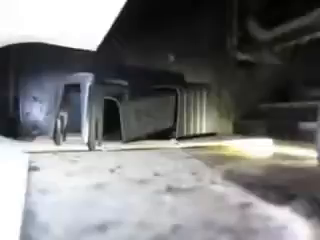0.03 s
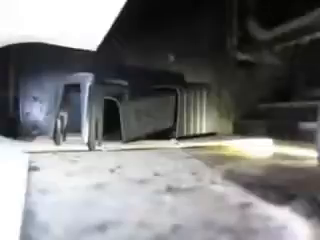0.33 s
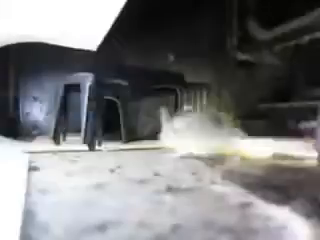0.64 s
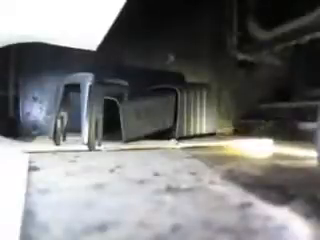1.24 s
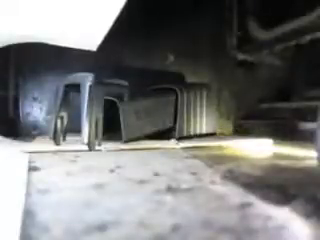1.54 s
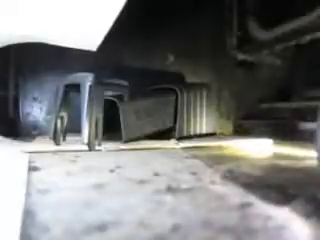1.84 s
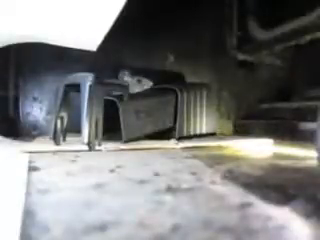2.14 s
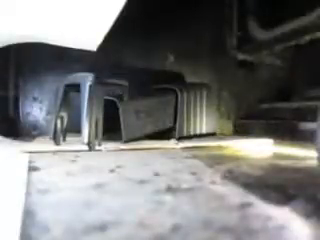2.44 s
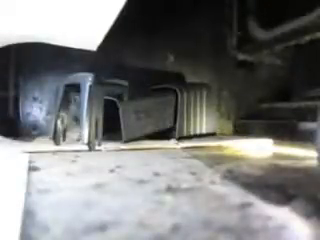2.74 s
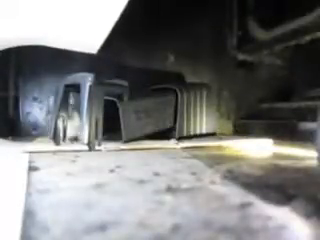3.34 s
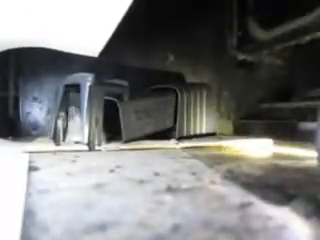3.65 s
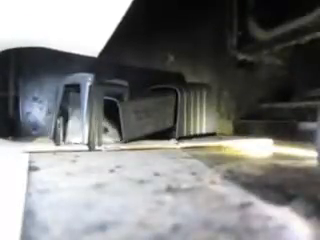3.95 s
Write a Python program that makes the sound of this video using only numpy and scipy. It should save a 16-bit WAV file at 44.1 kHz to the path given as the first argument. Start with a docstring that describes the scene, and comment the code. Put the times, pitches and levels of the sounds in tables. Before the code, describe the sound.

A mouse scampers over a hollow panel with faint patters and ticks, over steady hiss.

```python
"""First a humming motor, a steady hiss and a deep rumble fade in, in a cramped indoor corner.
A mouse scampers over a hollow panel: its pads patter, its claws scratch, and its landings thud
and make the panel ring. It climbs onto a plastic trap close by, where its claws tick.
At the very end the trap clatters, as quick blows ring its shell and its parts rub together."""
import sys
import numpy as np
from scipy import signal
from scipy.fft import rfft, irfft
from scipy.io import wavfile
from scipy.ndimage import uniform_filter1d

SR = 44100
rng = np.random.default_rng(int(sys.argv[2]) if len(sys.argv) > 2 else 0)


def store_wav(level_fs):
    """Save 16-bit WAV to argv[1]."""
    pcm = np.round(np.clip(np.atleast_2d(level_fs), -1, 1) * 32767)
    wavfile.write(sys.argv[1], SR, pcm.T.astype(np.int16))


N = 176400  # 4 seconds

def amp(db):
    """Turn decibels into a gain."""
    return 10 ** (np.asarray(db) / 20)

def unit(x):
    """Scale to an average power of 1."""
    return x / np.sqrt(np.mean(x ** 2))

def clock():
    """The time of every sample."""
    return np.arange(N) / SR

def noise():
    """White noise."""
    return rng.standard_normal(N)

def drift(per_s):
    """A smooth random wander, about 1 either way."""
    k = int(SR / per_s)
    steps = np.repeat(noise()[:N // k + 1], k)
    return 1.245 * uniform_filter1d(uniform_filter1d(steps, k), k)[:N]

def through(x, response):
    """Give every sample of x the same ring or echo."""
    return signal.fftconvolve(x, response)[:N]

def colour(x, points, size=8192):
    """Shape the tone by (f/Hz, level/dB) points; white noise keeps its power."""
    hz, db = np.array(points).T
    f = np.maximum(np.fft.rfftfreq(size, 1 / SR), 1)
    gains = amp(np.interp(np.log(f), np.log(hz), db))
    # fold the filter so that nothing sounds before the hit
    cepstrum = irfft(np.log(gains))
    cepstrum[1:size // 2] *= 2
    cepstrum[size // 2 + 1:] = 0
    response = irfft(np.exp(rfft(cepstrum)))
    return through(x, response / np.linalg.norm(response))

def hump(centre_hz, octaves):
    """Tone points that favour one pitch."""
    hz = np.geomspace(50, 12800, 65)
    distance = np.log2(hz / centre_hz) * 2 / octaves
    return np.c_[hz, -20 * np.log10(1 + distance ** 2 / 2)]

def dull(x, edge_hz):
    """Take off the treble above an edge."""
    return signal.sosfilt(signal.butter(2, edge_hz, fs=SR, output="sos"), x)

def ring(x, notes):
    """A struck object rings at its own notes; each falls 60 dB in its ring time."""
    t = clock()[:SR // 2]
    response = 0
    for hz, ring_s, db in notes:
        damping = np.log(1000) / ring_s
        response += amp(db) * 2 * damping / SR * np.exp(-damping * t) * np.sin(2 * np.pi * hz * t)
    return through(x, response)

def grains(per_s, scatter_db=3.5):
    """Tiny random touches of uneven size."""
    touches = (rng.random(N) < per_s / SR) * np.sign(noise())
    return unit(touches * amp(scatter_db * np.clip(noise(), -2, 2)))

def stroke(start, length, attack_s=0.0065, release_s=0.017):
    """The loudness of one movement: rise, hold, die away."""
    t = clock() - start
    return np.clip(t / attack_s, 0, 1) * np.exp(-np.maximum(t - length, 0) / release_s)

def push(start):
    """One instant push."""
    return 1. * (np.arange(N) == int(start * SR))

def crack(start, decay_s):
    """A sudden crackle that dies away."""
    t = clock() - start
    return np.sign(noise()) * (t >= 0) * np.exp(-np.abs(t) / decay_s)

def room(x, echo_db=1.5, ring_s=0.13, gap_s=.0015):
    """The direct sound plus a short wash of echoes from the near walls."""
    t = clock()[:SR // 2]
    tail = noise()[:len(t)] * (t > gap_s) * np.exp(-np.log(1000) * t / ring_s)
    echoes = through(x, tail / np.linalg.norm(tail))
    return (x + amp(echo_db) * echoes) / np.hypot(1, amp(echo_db))

# the motor's tones: multiple of its turning rate, level/dB
MOTOR_TONES = [(1, -33.5), (2, -54.5), (4, -66.5), (9, -62), (16.08, -80.5)]
def motor(shaft_hz=57.64, wobble=0.0022, flutter_db=1):
    """A turning motor hums with faint overtones; pitch and level waver slightly."""
    turns = np.cumsum(shaft_hz * (1 + wobble * drift(3.845))) / SR
    hum = 0
    for multiple, db in MOTOR_TONES:
        peak = np.sqrt(2) * amp(db + flutter_db * drift(8.74))
        hum += peak * np.sin(2 * np.pi * (multiple * turns + rng.random()))
    return hum

# tone of the hiss: f/Hz, relative level/dB
HISS_TONE = [(20, -1.5), (40, -1), (80, -7), (150, -12.5), (300, -19), (600, -24.5), (1200, -29),
             (2400, -34.5), (4500, -38), (7000, -39), (8500, -43.5), (9800, -57.5)]
def hiss(level_db=-41.5):
    """Steady noise, strongest in the bass."""
    return amp(level_db) * colour(noise(), HISS_TONE)

# how loud the rumble is over time: t/s, level/dB
RUMBLE_LEVELS = [(.14, -27.5), (.23, -29), (.4, -32.5), (.65, -46.5), (1.3, -35), (1.41, -23.5),
                 (1.52, -32), (1.8, -29.5), (2.05, -33), (2.35, -47.5), (3.9, -54)]
def rumble(centre_hz=22.4, width_hz=12.7):
    """Very deep noise that sinks after the start and swells again while the mouse runs."""
    f = np.fft.rfftfreq(N, 1 / SR)
    deep = irfft(rfft(noise()) / (1 + (2 * (f - centre_hz) / width_hz) ** 2), N)
    level_db = np.interp(clock(), *np.array(RUMBLE_LEVELS).T)
    return unit(deep) * amp(level_db)

# runs of soft steps: t/s, length/s, level/dB
SOFT_STEPS = [(0.471, 0.027, -51), (1.204, 0.035, -42.5), (1.283, 0.14, -41.5), (1.398, 0.07, -39.5),
              (1.465, 0.1, -41), (1.617, 0.041, -45.5), (1.672, 0.11, -40.5), (1.807, 0.044, -38.5),
              (1.903, 0.029, -42), (1.99, 0.075, -44), (2.766, 0.13, -50)]
# claw scuffles: t/s, length/s, scrape level/dB, scratch level/dB, scrape's top edge f/Hz
SCUFFLES = [(0.414, 0.065, -54, -66, 1600), (1.181, 0.043, -41, -59.5, 1150), (1.26, 0.045, -38, -58, 1200),
            (1.313, 0.048, -43, -53, 1200), (1.387, 0.052, -39, -53.5, 1100),
            (1.445, 0.11, -42.5, -59.5, 1010), (1.589, 0.012, -43.5, -51, 1600),
            (1.641, 0.037, -50, -57, 1810), (1.735, 0.025, -38, -55.5, 1600),
            (1.794, 0.078, -41, -52, 1900), (1.893, 0.054, -41.5, -52.5, 1600),
            (1.966, 0.087, -48, -57, 1310), (2.035, 0.036, -43, -59, 2200), (2.397, 0.12, -47.5, -63, 1290),
            (2.53, 0.036, -48, -52.5, 1490), (2.63, 0.062, -49, -61, 1500), (2.82, 0.036, -44.5, -59, 1300),
            (2.923, 0.072, -48.5, -56.5, 1700), (3.307, 0.0087, -42.5, -59, 1300),
            (3.385, 0.015, -41.5, -59, 2000), (3.748, 0.016, -48, -50, 1600)]
# tones of the pads, the low scrape and the fine scratch: f/Hz, relative level/dB
PAD_TONE = [(40, -11.5), (110, -3), (185, 3.5), (275, -4), (370, -3), (520, -6), (900, -28), (3000, -64)]
SCRAPE_TONE = [(100, -8), (350, -8.5), (600, 0), (950, 6.5), (1400, 4), (1900, -1.5), (4000, -27),
               (9000, -39)]
SCRATCH_TONE = [(500, -8.5), (1500, -4), (2500, 5.5), (3800, 5.5), (5500, 5.5), (7000, 0.5), (8500, -2.5),
                (10000, -20.5)]
# the hollow panel's notes: f/Hz, ring time/s, level/dB above the bare touch
PANEL_NOTES = [(162, 0.15, 6), (227.3, 0.25, 10), (317, 0.16, 0), (357.7, 0.18, 4), (512.5, 0.26, 1.5),
               (682, 0.15, 8), (811, 0.25, -1.5), (833, 0.2, 2.5), (927, 0.25, 6.5), (1035, 0.15, -4.5),
               (1430, 0.24, 3.5), (1875, 0.12, 9)]
def feet(pads_per_s=270, claws_per_s=850):
    """Pads patter and claws scrape, ringing the panel, with a fine dry scratch on top."""
    pads = grains(pads_per_s) * sum(amp(db) * stroke(t, length) for t, length, db in SOFT_STEPS)
    claws = grains(claws_per_s)
    scrape, scratch = 0, 0
    for t, length, scrape_db, scratch_db, edge_hz in SCUFFLES:
        scuffle = claws * stroke(t, length)
        scrape += amp(scrape_db) * dull(scuffle, edge_hz)
        scratch += amp(scratch_db) * scuffle
    contact = (colour(pads, PAD_TONE) + colour(scrape, SCRAPE_TONE)) / 2
    return room(contact + colour(scratch, SCRATCH_TONE)) + ring(contact, PANEL_NOTES)

# firm landings: t/s, ring level/dB, centre f/Hz, thud level/dB
FIRM_LANDINGS = [(.486, -16.5, 290, -15.5), (1.335, -6, 910, -31), (1.416, -13, 593, -29),
                 (1.439, -15, 394, -14), (1.52, -23, 486, -20.5), (1.826, -9, 340, -11),
                 (1.85, -15, 235, -10), (1.935, -11, 282, -16), (2.056, -17, 1210, -20),
                 (3.321, -22, 450, -23.5)]
def landings(width_octaves=0.44):
    """The mouse's weight thuds down and rings the panel; a more cushioned landing sounds lower."""
    shake, thuds = 0, 0
    for t, ring_db, centre_hz, thud_db in FIRM_LANDINGS:
        contact = colour(push(t), hump(centre_hz, width_octaves))
        shake += amp(ring_db) * contact
        thuds += amp(thud_db) * contact
    return ring(shake, PANEL_NOTES) + room(thuds)

# claw ticks: t/s, level/dB, centre f/Hz, decay/s, tone width/octaves
CLAW_TICKS = [(1.324, -40, 5140, .004, 1.2), (1.6, -32, 3800, 0.0028, 3.3),
              (1.649, -36.5, 3300, 0.0039, 3.2), (1.667, -36, 7700, .002, .7),
              (1.691, -22, 2560, 0.0012, 1.9), (1.6922, -27, 6900, 0.0035, 0.71),
              (1.721, -21, 3480, 0.0012, 0.73), (1.7245, -29, 4300, 0.0014, .8),
              (1.833, -32, 7000, 0.005, 1.6), (1.915, -33, 6000, 0.002, 0.76),
              (2.547, -35.5, 6000, 0.0024, 1.1), (2.573, -38, 5000, .002, 1.5),
              (2.677, -44.5, 1900, 0.0045, 1.5), (2.789, -32, 2700, 0.0034, 5.1),
              (2.988, -35, 2380, 0.00076, 1.5), (3.32, -36, 4200, 0.0016, .8),
              (3.4854, -26, 6300, 0.0019, 2.9), (3.4904, -23.5, 5700, 0.0011, 0.52),
              (3.495, -39.5, 2400, 0.0036, 0.83), (3.7598, -37.5, 1720, 0.0016, 0.86)]
# tone shared by all ticks: f/Hz, relative level/dB
TICK_TONE = [(200, -34), (700, 5.5), (1200, 12), (3000, 0), (6500, -2.5), (8500, -1), (10000, -17.5)]
# the light plastic parts' notes: f/Hz, ring time/s, level/dB above the bare touch
PLASTIC_NOTES = [(1148, 0.098, 4), (1454, 0.16, 3.5), (1850, 0.073, -1.5), (2263, 0.084, 4),
                 (2990, .14, 2.5), (4240, .11, 3), (5210, 0.11, -1.5), (5900, 0.1, -4), (6570, 0.04, -1.5)]
def ticks(first_touch_db=4):
    """Sharp claw taps ring the plastic; they are close, so they have less echo."""
    taps = 0
    for t, db, centre_hz, decay_s, octaves in CLAW_TICKS:
        tap = crack(t, decay_s) + amp(first_touch_db) * push(t)
        taps += amp(db) * colour(tap, hump(centre_hz, octaves))
    contact = colour(taps, TICK_TONE) / 2
    return room(contact, echo_db=0.5) + ring(contact, PLASTIC_NOTES)

# blows of the trap: t/s, knock level/dB, decay/s, rasp level/dB
TRAP_BLOWS = [(3.938, -24, 0.006, -32.5), (3.9421, -17.5, 0.002, -30), (3.962, -24, 0.0024, -25.5),
              (3.97, -26.5, 0.0034, -31), (3.975, -36, 0.0037, -35), (3.983, -26, .004, -26.5),
              (3.993, -41, .003, -25)]
# tones of the knocks and the rasps: f/Hz, relative level/dB
KNOCK_TONE = [(50, -34), (170, 9), (260, -5), (360, -1.5), (650, -5.5), (950, -15.5), (1350, -8.5),
              (1800, -9), (2300, -17), (4000, -30), (6000, -77)]
RASP_TONE = [(600, -11.5), (1000, 4.5), (1300, 8), (1800, 7), (2400, -4.5), (3600, 1), (4700, -12),
             (5800, -27), (9000, -43)]
# the trap shell's notes: f/Hz, ring time/s, relative level/dB
SHELL_NOTES = [(144, 0.15, 14.5), (362, 0.23, 17), (480, 0.14, 0.5), (625, 0.064, 0), (800, 0.093, -17),
               (1310, 0.12, -6), (1700, 0.14, 1), (1870, 0.14, -2), (2000, 0.17, -10), (3280, 0.11, -5),
               (3540, 0.16, -12)]
def clatter(shell_gain_db=29.5):
    """Quick blows ring the trap's shell while its parts rasp together."""
    pushes = sum(amp(db) * push(t) for t, db, _, _ in TRAP_BLOWS)
    knocks = sum(amp(db) * crack(t, decay_s) for t, db, decay_s, _ in TRAP_BLOWS)
    rasps = sum(amp(db) * crack(t, decay_s) for t, _, decay_s, db in TRAP_BLOWS)
    shell = amp(shell_gain_db) * ring(pushes, SHELL_NOTES)
    return room(colour(knocks, KNOCK_TONE) + colour(rasps, RASP_TONE)) + shell

def scene(lean_db=2.5):
    """Everything sits in the middle except the clatter, which leans left."""
    middle = motor() + rumble() + hiss() + feet() + landings() + ticks()
    left_right = amp(np.array([[lean_db], [-lean_db]]) / 2)
    return middle + clatter() * left_right

def record(dry, start_s=0.12, fade_s=0.096, top_hz=9950):
    """Fade in just after the start and cut the highest treble."""
    fade = np.clip((clock() - start_s) / fade_s, 0, 1) ** 1.6
    treble_cut = signal.ellip(10, .2, 80, top_hz, fs=SR, output="sos")
    return signal.sosfilt(treble_cut, dry * fade)

dry = scene()
out = record(dry)
store_wav(out)
```